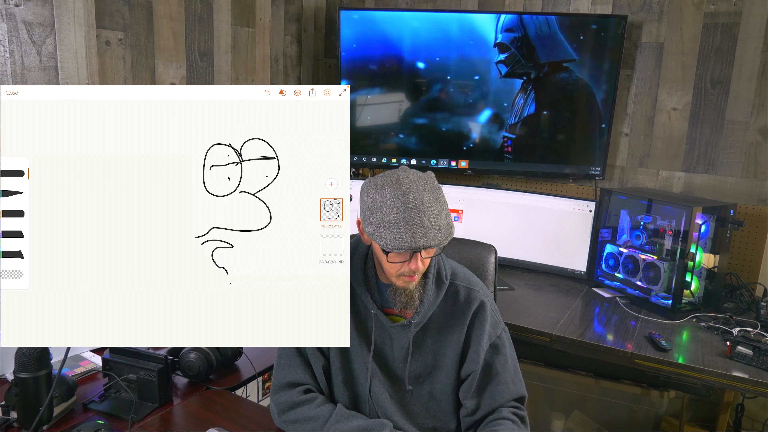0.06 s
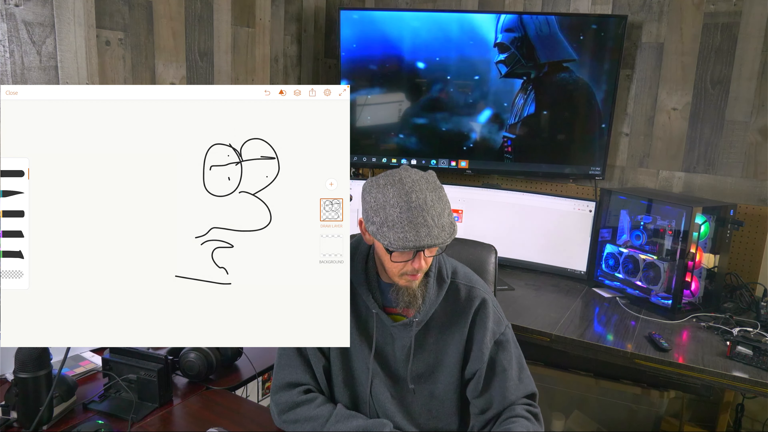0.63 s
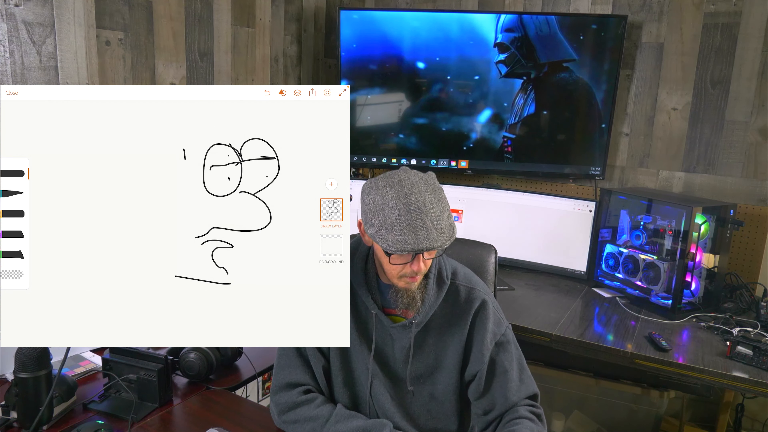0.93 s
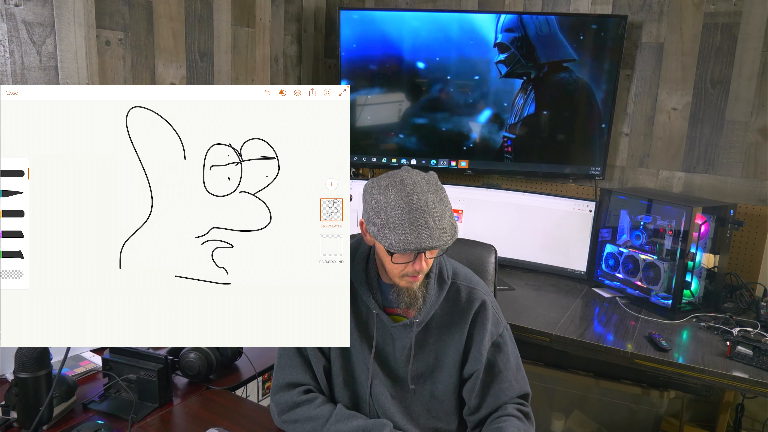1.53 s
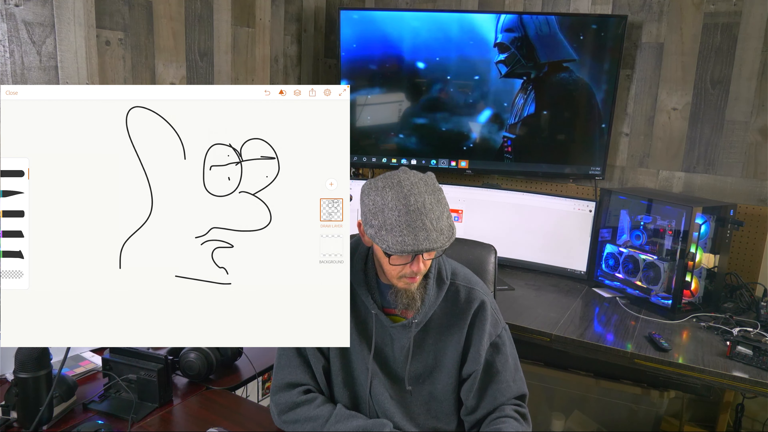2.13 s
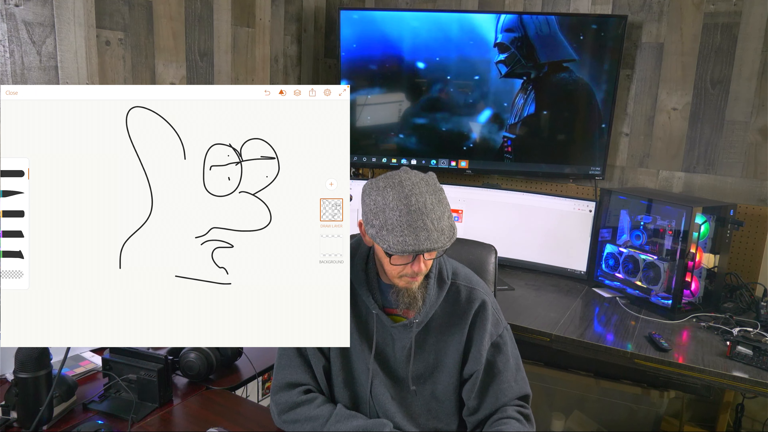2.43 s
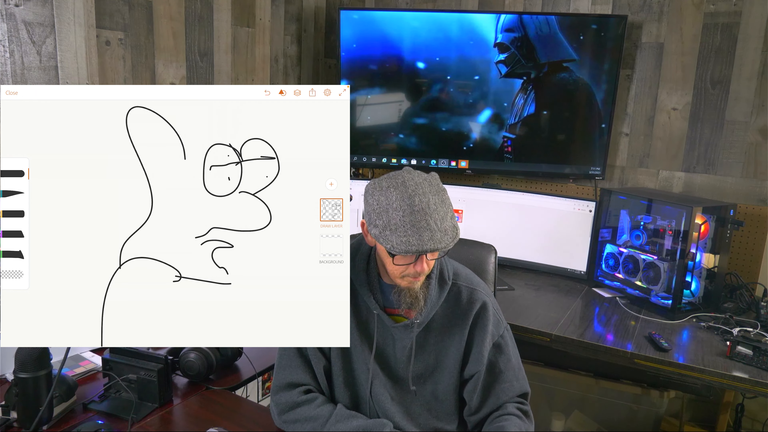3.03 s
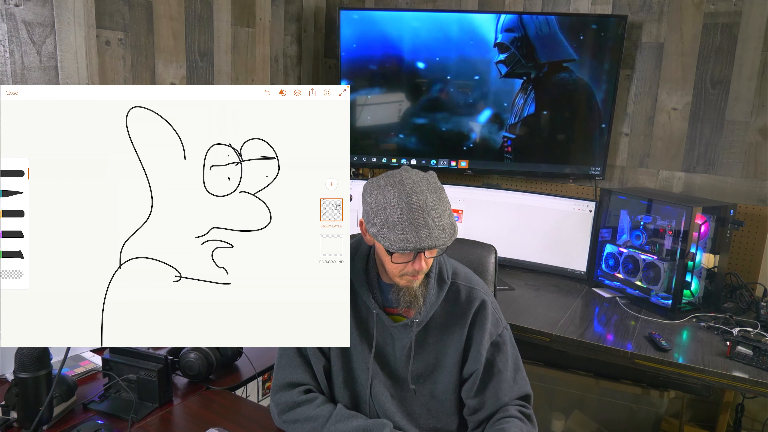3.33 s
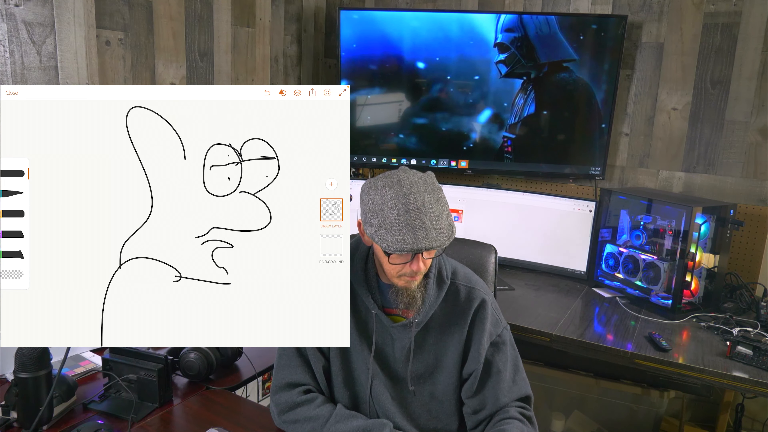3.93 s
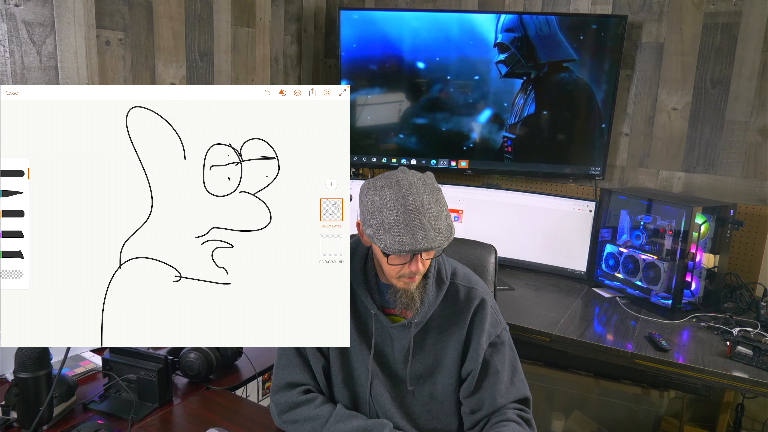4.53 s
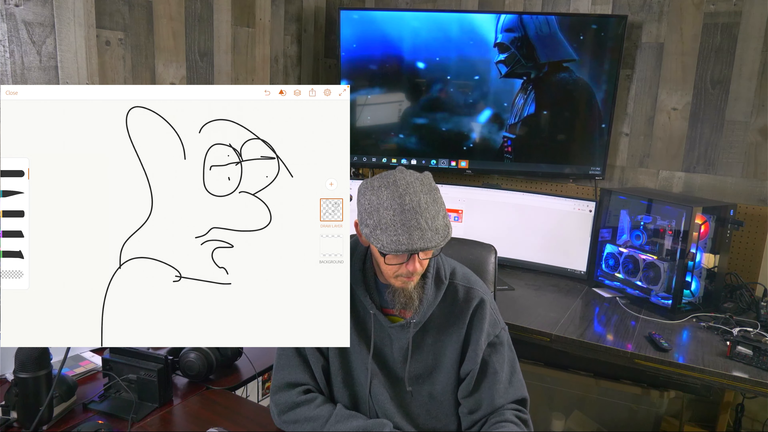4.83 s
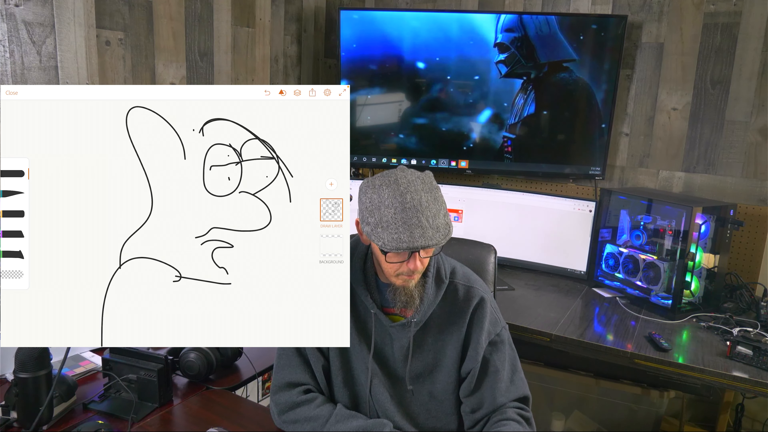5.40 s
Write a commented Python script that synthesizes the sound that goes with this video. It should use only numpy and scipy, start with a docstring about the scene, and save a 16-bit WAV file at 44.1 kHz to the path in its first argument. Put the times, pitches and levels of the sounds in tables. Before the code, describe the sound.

Close by in a small room, a pen tip lands on a tablet screen in short, irregular taps, each mixing a glassy tick with a small thump. Some are dull and others bright, with faint scuffing as the tip slides. The taps are sparse in the middle and come more often near the end. Computer fans hum softly underneath, their low drone gently rising and falling.

```python
"""Stylus on a glass tablet

A hard stylus taps and draws on a tablet lying on a desk in a small room. Each touch rings the
damped screen and frame, thumps the case and clicks the pen; the sliding tip rubs and hisses faintly.
Steady computer fans hum behind it; a noise gate opens at several taps and slowly closes,
lifting the low drone more than the hiss."""
import sys
import numpy as np
from scipy import signal
from scipy.fft import rfft, irfft
from scipy.io import wavfile

SR = 44100
rng = np.random.default_rng(int(sys.argv[2]) if len(sys.argv) > 2 else 0)


def wav_out(sig):
    """Save sig, one row per channel (or a flat mono array), as 16-bit PCM at SR to the path in sys.argv[1]."""
    wavfile.write(sys.argv[1], SR, np.round(np.clip(np.atleast_2d(sig).T, -1, 1) * 32767).astype(np.int16))


N = 245240
TIME = np.arange(N) / SR


def from_db(db):
    """Decibels to gain."""
    return 10 ** (np.asarray(db) / 20)


def at_hz(table, hz, column=1):
    """Table column interpolated over log frequency."""
    table = np.array(table)
    return np.interp(np.log(np.maximum(hz, 1)), np.log(table[:, 0]), table[:, column])


def low_pass(x, hz, order=2):
    """Causal Butterworth low-pass."""
    return signal.sosfilt(signal.butter(order, hz, fs=SR, output="sos"), x)


def coloured(white, spectrum):
    """Noise shaped to a spectrum, rms 1."""
    gain = from_db(at_hz(spectrum, np.arange(N // 2 + 1) * SR / N))
    shaped = irfft(rfft(white) * gain, N)
    return shaped / np.std(shaped)


# Fan air spectrum: f/Hz, relative density/dB
FAN_SPECTRUM = [(25, -16), (60, -5.5), (140, -3), (220, 1), (320, -4), (430, -14), (760, -23),
                (1500, -22.5), (2200, -28.5), (3900, -31), (5000, -38), (11000, -40), (13000, -45),
                (15500, -43.5)]
# Blade and motor tones: f/Hz, level before the gate/dB
FAN_TONES = [(220.7, -74.5), (620.5, -81), (1515, -95.5), (1583, -94), (3182, -101)]


def fans(noise_db=-63.5):
    """Steady air noise plus blade and motor tones."""
    noise = from_db(noise_db) * coloured(rng.standard_normal(N), FAN_SPECTRUM)
    tones = sum(from_db(db) * np.sqrt(2) * np.cos(2 * np.pi * (hz * TIME + rng.random()))
                for hz, db in FAN_TONES)
    return noise + tones


# Gate openings, the last stays open: t/s, open gain/dB, closing/(dB/s)
GATE_OPENINGS = [(0, 2, 5), (0.115, 9.5, 11), (1.02, 8.5, 13), (2.735, 6.5, 14.5), (3.67, 3.5, 18),
                 (4.625, 7, 11), (5.095, 8.5, -2)]


def noise_gate(background, attack_s=0.02, crossover_hz=404, hiss_gain_db=1, hiss_share=0.41):
    """The gate opens at listed times and slowly closes, lifting the low drone more than the hiss."""
    gain_db = np.full(N, float(GATE_OPENINGS[0][1]))
    for start_s, open_db, closing_db_per_s in GATE_OPENINGS:
        since_s = TIME - start_s
        opened = np.clip(since_s / attack_s, 0, 1)
        gain_db = (1 - opened) * gain_db + opened * (open_db - closing_db_per_s * since_s)
    drone = signal.sosfiltfilt(signal.butter(4, crossover_hz, fs=SR, output="sos"), background)
    hiss = background - drone
    return drone * from_db(gain_db) + hiss * from_db(hiss_gain_db + hiss_share * gain_db)


# Skid spectrum: f/Hz, relative density/dB
SKID_SPECTRUM = [(150, -10), (500, 12.5), (800, 11.5), (1300, 11), (2500, 1.5), (3800, -1.5), (5000, -13.5),
                 (7000, -22), (10000, -26.5), (15000, -32)]
# Tip landings, each a skid and a tap: t/s, screen/dB, contact corner/Hz, case thump/dB,
# pen click/dB, skid/dB, pitch factor of the spot, desk echo delay/ms, frame/dB
TOUCHES = [ (0.1182, -14.5, 1450, -24, -22, -35, 1.01, 3.25, -30.5),
           (0.2364, -20, 1510, -23.5, -31.5, -36, 1.024, 3.43, -33),
           (1.0187, -2, 468.3, -22.5, -29, -36.5, 1.07, 3.6, -21.5),
           (1.166, -72, 2500, -50.5, -59, -62.5, 0.7, 4.55, -83),
           (2.738, -7, 698, -20.5, -53, -39.5, 1.034, 3.84, -42),
           (3.027, -63, 2500, -56, -60, -61, 1.2, 5.3, -69),
           (3.240, -64, 1500, -48.5, -65.5, -65.5, 0.78, 4.8, -61.5),
           (3.6747, -28.5, 530, -28.5, -51, -55, 0.777, 7.83, -41.5),
           (3.7307, -50, 3000, -67.5, -36.5, -52, 0.86, 4.5, -67),
           (4.628, -34, 1310, -24.5, -22, -39.5, 0.91, 5.6, -43),
           (4.708, -14, 1880, -24, -43, -38.5, 1.004, 3.94, -52),
           (5.0958, -8.5, 2070, -24, -28.5, -36.5, 1.01, 3.85, -40),
           (5.541, -7, 3150, -18, -9.5, -32.5, 0.97, 3.73, -39)]


def skids(graze_s=0.0057, settle_s=0.014):
    """The moving tip grazes the glass just before it bears down, then scuffs briefly."""
    pressure = np.zeros(N)
    for start_s, _, _, _, _, skid_db, *_ in TOUCHES:
        since_s = TIME - start_s
        graze = np.sqrt(np.clip(1 + since_s / graze_s, 0, 1))
        settle = np.exp(-np.maximum(since_s, 0) / settle_s)
        pressure += from_db(skid_db) * graze * settle
    return pressure * coloured(rng.standard_normal(N), SKID_SPECTRUM)


def ring(modes, t, pitch=1):
    """Velocity of damped modes struck at t = 0; neighbours swing in opposite senses."""
    hz, width_hz, db = np.transpose(modes)[:, :, None]
    sign = (-1) ** np.arange(len(modes))[:, None]
    phase = 2 * np.pi * hz * pitch * t
    swing = np.cos(phase) - width_hz / (2 * hz * pitch) * np.sin(phase)
    envelope = from_db(db) * np.exp(-np.pi * width_hz * t)
    return np.sum(sign * envelope * swing, axis=0) * np.where(t > 0, 1, 0.5)


# Glass screen modes: f/Hz, width/Hz, level/dB
SCREEN_MODES = [(491.8, 108, -1.5), (663, 300, -2.5), (835, 177, 2), (1092, 130, -8.5), (1463, 284, -1),
                (1892, 170, -6), (2478, 150, -15.5)]
# Longer-ringing frame mode: f/Hz, width/Hz, level/dB
FRAME_MODES = [(626, 20, -1.5)]
# Modes of the case on the desk: f/Hz, width/Hz, level/dB
CASE_MODES = [(75, 70, -11), (130, 58, -6.5), (253, 98, 2), (336, 62, 2)]
# Pen tip and barrel modes: f/Hz, width/Hz, level/dB
PEN_MODES = [(1601, 1500, -8), (2450, 610, -3), (3130, 350, -4.5), (3500, 300, -6.5), (4560, 470, -10),
             (5930, 1900, -11), (9200, 3100, -12.5)]


def taps(firm_contact_hz=1500, lowest_mode_db=3, soft_loss_db_per_oct=7,
         echo_db=-6.5, echo_db_per_oct=1.5):
    """Each touch rings screen, frame, case and pen; the desk returns a dull echo."""
    out, t = np.zeros(N + SR), np.arange(SR // 4) / SR
    for start_s, screen_db, contact_hz, thump_db, click_db, _, pitch, echo_ms, frame_db in TOUCHES:
        sharpness_oct = np.log2(contact_hz / firm_contact_hz)
        # A soft landing stirs the lowest mode less and sounds duller.
        lowest_gain = from_db(lowest_mode_db + soft_loss_db_per_oct * min(sharpness_oct, 0))
        glass = lowest_gain * ring(SCREEN_MODES[:1], t, pitch) + ring(SCREEN_MODES[1:], t, pitch)
        body = from_db(screen_db) * glass + from_db(frame_db) * ring(FRAME_MODES, t)
        # The heavy case follows more slowly.
        case = from_db(thump_db) * low_pass(ring(CASE_MODES, t), 0.31 * contact_hz, order=1)
        pen = from_db(click_db) * low_pass(ring(PEN_MODES, t), hz=9970)
        blow = low_pass(body, contact_hz) + case + pen
        delayed = np.interp(t - echo_ms / 1000, t, blow, left=0)
        echo = from_db(echo_db + echo_db_per_oct * sharpness_oct) * low_pass(delayed, hz=1500, order=1)
        start = round(start_s * SR)
        out[start:start + len(t)] += blow + echo
    return out[:N]


# Scatter and reverberation: f/Hz, early/dB, late/dB, late T60/s
ROOM_BANDS = [(79.9, -1, -10.5, 0.39), (140, -2.5, -15, .6), (285, -8.5, -13, 0.73),
              (530, -15.5, -30.5, 0.15), (784, -19.5, -33.5, .4), (1100, -10.5, -18.5, 0.38),
              (3000, -16, -19, 0.447), (6060, -11, -15.5, .35), (14000, -7, -22, .25)]


def room(x, gap_s=0.0033, build_s=0.0041, early_t60_s=0.1):
    """Quick scatter from things on the desk, then a faint tail dying band by band."""
    t = np.arange(SR * 3 // 4) / SR
    edges_hz = np.geomspace(35, 17000, 24)
    white = rng.standard_normal((2, len(t)))
    onset = np.clip((t - gap_s) / build_s, 0, 1)
    response = np.zeros(len(t))
    for k, (low, high) in enumerate(zip(edges_hz, edges_hz[1:])):
        band = signal.sosfilt(signal.butter(2, [low, high], "band", fs=SR, output="sos"), white[k % 2])
        centre_hz = np.sqrt(low * high)
        early_db, late_db, late_t60_s = [at_hz(ROOM_BANDS, centre_hz, column) for column in (1, 2, 3)]
        for db, t60_s in ((early_db, early_t60_s), (late_db, late_t60_s)):
            tail = band * onset * np.exp(-np.log(1000) * t / t60_s)
            band_norm = np.sqrt(2 * (high - low) / SR / np.sum(tail ** 2))
            response += from_db(db) * band_norm * tail
    return signal.fftconvolve(x, response)[:N]


# Pen strokes: t/s, hold/s, rub/dB, easing/(dB/s)
PEN_STROKES = [(0.25, 0.0088, -50.5, 124), (1.03, .01, -61.5, 137.5), (2.759, 0.0094, -58, 54.5),
               (3.705, .01, -64, 39.5), (4.699, .01, -55, 76), (5.11, 0.18, -48.5, 129)]
# Quick tip flicks: t of top speed/s, half length/s, hiss/dB
TIP_FLICKS = [(3.731, 0.0087, -62.5), (5.255, 0.033, -59)]
# Rub through the screen: f/Hz, relative density/dB
RUB_SPECTRUM = [(80, -6), (250, 6), (430, -5.5), (570, -9.5), (620, 9.5), (700, -11), (1500, -6),
                (2200, -9.5), (2700, -12.5), (3800, -15.5), (5500, -35), (10000, -41.5)]
# Tip hiss: f/Hz, relative density/dB
HISS_SPECTRUM = [(2500, -17.5), (4000, 4), (5700, 9), (7500, -3), (10000, -1.5), (13000, -11.5),
                 (16000, -20)]


def sliding(landing_s=0.035, hiss_re_rub_db=-21, hiss_exponent=1.4):
    """The tip catches on tiny asperities: a low rub through the screen and a faster-fading hiss."""
    rub, hiss = np.zeros(N), np.zeros(N)
    for start_s, hold_s, rub_db, easing_db_per_s in PEN_STROKES:
        since_s = TIME - start_s
        landing = np.clip(1 + since_s / landing_s, 0, 1)
        pressure = landing * from_db(-easing_db_per_s * np.maximum(since_s - hold_s, 0))
        rub += from_db(rub_db) * pressure
        hiss += from_db(rub_db + hiss_re_rub_db) * pressure ** hiss_exponent
    for peak_s, half_s, hiss_db in TIP_FLICKS:
        hiss += from_db(hiss_db) * np.exp(-((TIME - peak_s) / half_s) ** 2)
    friction = rng.standard_normal(N)
    return rub * coloured(friction, RUB_SPECTRUM) + hiss * coloured(friction, HISS_SPECTRUM)


def scene():
    """Pen and tablet close by, room and gated fan noise behind; mono."""
    touches = skids() + taps()
    return (touches + room(touches) + sliding() + noise_gate(fans()))[None]


def record(dry):
    """Steep elliptic treble cut."""
    cutoff_hz = 15400
    return signal.sosfilt(signal.ellip(10, 0.1, 80, cutoff_hz, fs=SR, output="sos"), dry)


dry = scene()
out = record(dry)
wav_out(out)
```